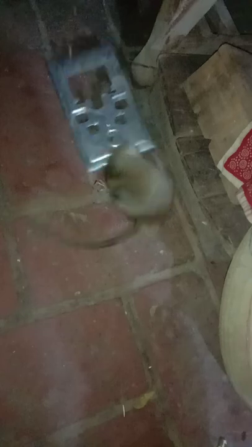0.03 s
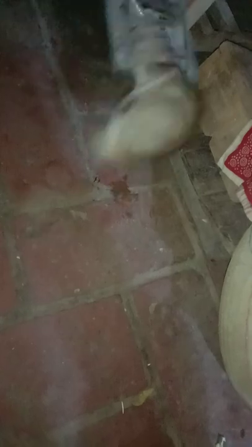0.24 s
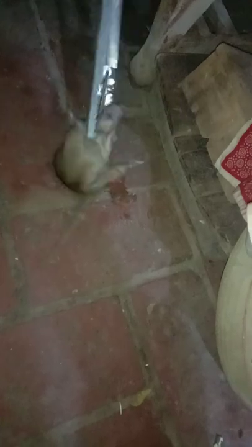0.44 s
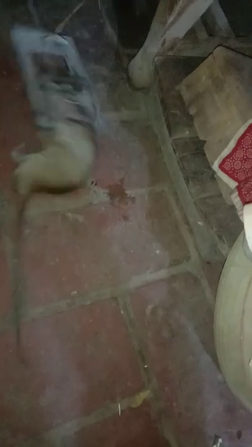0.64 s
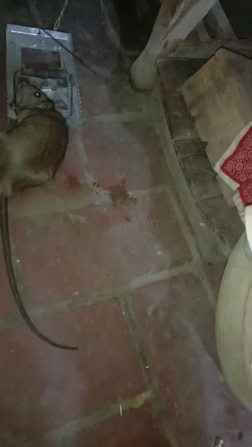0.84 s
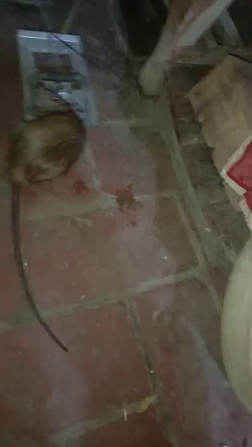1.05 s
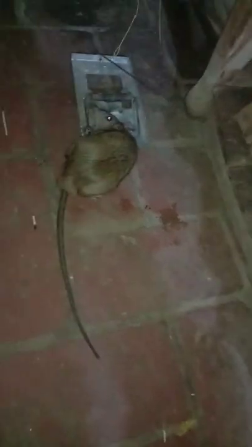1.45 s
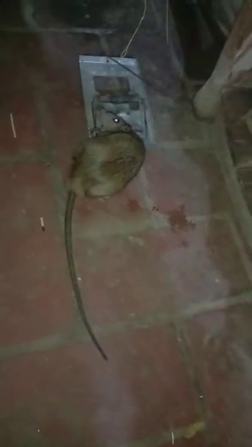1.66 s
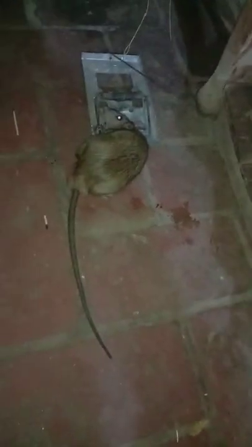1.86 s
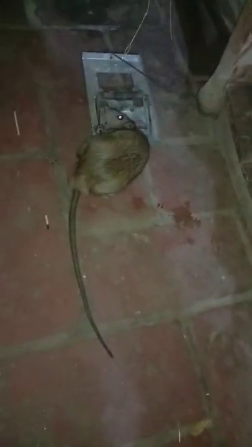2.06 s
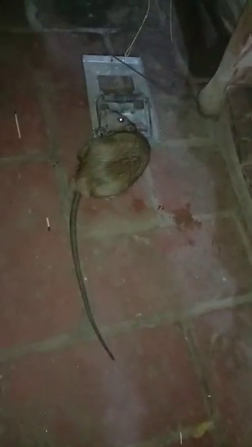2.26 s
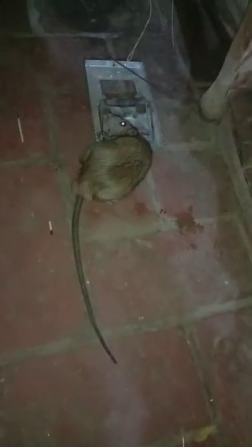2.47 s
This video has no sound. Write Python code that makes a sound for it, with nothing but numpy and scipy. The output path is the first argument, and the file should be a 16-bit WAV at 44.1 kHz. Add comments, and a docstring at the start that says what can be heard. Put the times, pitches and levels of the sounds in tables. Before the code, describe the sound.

Close by in a small room, a steel trap rattles and skids across tiles in dense, bright bursts while a rat's body thumps softly. The clatter ends quickly, and only a few light rustles remain over low room noise.

```python
"""A small room with a tiled floor: a rat in a sheet-steel snap trap thrashes for about a second.
The trap slams down and chatters in runs of tiny bounces, and skids over grit; its plate and
wire bow ring until it lies flat, and the soft body lands in low thumps. A few faint shuffles
follow as the animal lies almost still, over the room's low, uneven rumble and thin hiss."""
import sys
import numpy as np
from scipy import signal
from scipy.fft import rfft, irfft
from scipy.io import wavfile
from scipy.ndimage import uniform_filter1d, minimum_filter1d

SR = 44100
rng = np.random.default_rng(int(sys.argv[2]) if len(sys.argv) > 2 else 0)


def dump_mix(stems):
    """Bounce the given channels to the path in sys.argv[1] as a 16-bit WAV at rate SR."""
    frames = np.atleast_2d(stems).T  # one column per channel
    limited = np.clip(frames, -1, 1)  # hard clip at full scale
    pcm = np.round(limited * 32767).astype(np.int16)
    wavfile.write(sys.argv[1], SR, pcm)


N = 110250
TIME = np.arange(N) / SR


def from_db(db):
    """Decibels to gain."""
    return 10 ** (np.asarray(db) / 20)


def unit(x):
    """Scale to an energy of one."""
    return x / np.sqrt(np.sum(x ** 2) + 1e-20)


def convolve(x, response):
    """Pass a sound through a response."""
    return signal.fftconvolve(x, response)[:N]


def equalise(x, curve, size=8192):
    """Minimum-phase EQ along a curve of (freq_hz, gain_db); white noise keeps its level."""
    hz, db = np.transpose(curve)
    grid_hz = np.maximum(np.linspace(0, SR / 2, size // 2 + 1), 1)
    gain = from_db(np.interp(np.log(grid_hz), np.log(hz), db))
    cepstrum = irfft(np.log(gain))
    cepstrum[1:size // 2] *= 2
    cepstrum[size // 2 + 1:] = 0
    response = irfft(np.exp(rfft(cepstrum)))
    return convolve(x, unit(response))


def decay(t60_s, size):
    """A fall of 60 dB in t60_s seconds."""
    return np.exp(-np.log(1000) * TIME[:size] / t60_s)


def add(track, start_s, sound):
    """Mix a sound in at a given time."""
    i = max(int(start_s * SR), 0)
    track[..., i:i + sound.shape[-1]] += sound[..., :N - i]


# EQ of the room's rumble and of its hiss: freq_hz, gain_db
RUMBLE_EQ = [(30, -35), (60, -26.5), (88, -11.5), (100, 4), (126, -0.5), (140, -10.5), (185, -12.5),
             (235, -17.5), (257, -7.5), (285, -30.5), (500, -54.5)]
HISS_EQ = [(100, -7.5), (400, 5), (1050, -2.5), (1240, 5), (1420, -3), (1700, -4), (2300, -9),
           (3400, -10.5), (5000, -10.5), (6200, -13), (6600, -18.5), (7200, 2), (7750, -2.5), (8400, -21.5),
           (13800, -32), (15300, -16), (16000, -25)]
# Fader ride on the room tone: time_s, gain_db
ROOM_TONE_RIDE = [(.08, -14), (.3, -13), (.8, -2), (1.0, 4.5), (2.5, 3)]
def room_tone(rumble_db=-58.5, hiss_db=-72.5):
    """A narrow, beating rumble under faint hiss, both swelling over the first second."""
    rumble = from_db(rumble_db) * equalise(rng.standard_normal(N), RUMBLE_EQ)
    hiss = from_db(hiss_db) * equalise(rng.standard_normal(N), HISS_EQ)
    ride_db = np.interp(TIME, *np.transpose(ROOM_TONE_RIDE))
    return (rumble + hiss) * from_db(ride_db)


def contacts(envelope, per_s, spread_db=3.5, plate_t60_s=0.027):
    """Tiny random contacts under an envelope, each ringing the plate's crowded, damped modes."""
    size = len(envelope)
    touches = rng.random(size) < per_s / SR
    force = from_db(spread_db * np.minimum(rng.exponential(1, size), 3))
    clicks = touches * force * rng.choice([-1, 1], size)
    clicks[0] = 3  # a firm first contact
    plate = rng.standard_normal(size) * decay(plate_t60_s, size)
    return unit(convolve(clicks * envelope, plate))


def drag(length_s, edge_s=0.0017, sag_db=6.5, size=8192):
    """A stroke over grit at unit level, sagging as it slows."""
    t = TIME[:size]
    gate = np.clip(np.minimum(t, length_s - t) / edge_s, 0, 1)
    stroke = gate * from_db(-sag_db * t / length_s)
    return contacts(stroke, per_s=2500) * np.sqrt(length_s * SR)


# Faint rubs as the animal shifts: start_s, length_s, level_db, centre_hz, width_hz
SHUFFLES = [(0.071, 0.047, -72.5, 654, 304), (1.032, 0.075, -57, 3560, 1040),
            (1.023, 0.11, -53, 6350, 2430), (1.182, 0.025, -66.5, 3630, 904),
            (1.167, 0.078, -79, 8900, 1208), (1.215, 0.021, -72, 3690, 905),
            (1.697, 0.096, -68, 1230, 131.2), (1.712, .06, -71.5, 1674, 200),
            (2.235, 0.017, -63.5, 3400, 598)]
def shuffles():
    """Light strokes that each wake only one resonance."""
    out = np.zeros(N)
    for start_s, length_s, level_db, centre_hz, width_hz in SHUFFLES:
        edges_hz = [centre_hz - width_hz / 2, centre_hz + width_hz / 2]
        band = signal.butter(2, edges_hz, "band", fs=SR, output="sos")
        rub = unit(signal.sosfilt(band, drag(length_s))) * np.sqrt(length_s * SR)
        add(out, start_s, from_db(level_db) * rub)
    return out


def sends(level_db, tile_db, thud_db, sizzle_db):
    """Gains into the steel, tile, thud and sizzle buses; the last three are relative to level_db."""
    return from_db(level_db + np.array([[0], [tile_db], [thud_db], [sizzle_db]]))


# Scrapes of the trap: start_s, length_s, level_db, tile_send_db, thud_send_db, sizzle_send_db
SKIDS = [(0.084, 0.023, -59.5, 9.5, 2, -14), (0.103, 0.032, -50, 6, -10.5, -7),
         (0.15, 0.062, -46, -6, -12.5, -6.5), (0.214, 0.066, -33, -15, -30.5, 0),
         (0.299, 0.021, -34.5, -2.5, -13.5, 0.5), (0.32, 0.073, -27.5, -4.5, -4.5, -3.5),
         (0.405, 0.038, -26, -5, -0.5, 1), (0.467, 0.055, -34, 0.5, -13, 3),
         (0.525, 0.048, -36.5, 1, 2.5, -5), (0.644, 0.1, -31.5, -8, -18, -0.5),
         (0.685, 0.061, -35.5, -5.5, -25, 1.5), (0.769, 0.032, -35.5, -5.5, -28, -1.5),
         (0.804, 0.12, -35.5, -28, -36.5, -4.5), (1.026, .08, -62, 6.5, 8, -9)]
def skids():
    """The plate drags over the tiles, feeding the four buses."""
    buses = np.zeros((4, N))
    for start_s, length_s, level_db, *sends_db in SKIDS:
        add(buses, start_s, sends(level_db, *sends_db) * drag(length_s))
    return buses


# EQ of the bright sheet steel and of its top sizzle: freq_hz, gain_db
STEEL_EQ = [(400, -56.5), (1500, -22.5), (2150, -27.5), (2450, -9.5), (2950, -6.5), (3600, -10), (4700, -6),
            (5500, -1.5), (6500, -2.5), (7300, 2.5), (8100, -9.5), (9000, -11.5), (10800, -14),
            (12000, -19.5), (14000, -21), (16000, -36.5)]
SIZZLE_EQ = [(9000, -30), (13500, -24), (14150, -9), (14600, 0), (15000, -1), (15400, -2), (15600, -26)]
def trap_tone(steel, sizzle, sizzle_db=-6.5):
    """The trap's side of each contact: a metallic crash with a sizzle near 15 kHz."""
    return equalise(steel, STEEL_EQ) + from_db(sizzle_db) * equalise(sizzle, SIZZLE_EQ)


# EQ of the hard tile and of the dull thud under it: freq_hz, gain_db
TILE_EQ = [(100, -56), (300, -29.5), (560, -13), (790, 0), (1000, -2), (1230, 6), (1430, -0.5), (1900, -4),
           (2600, 1), (4000, -6.5), (8000, -11.5)]
THUD_EQ = [(30, -35.5), (70, -15), (170, 7.5), (300, 0.5), (450, -6.5), (700, -0.5), (1300, -29),
           (3000, -55)]
def floor_tone(tile, thud, tile_db=-9.5, thud_db=-17):
    """The floor's side of each contact: a midrange knock or grind over a dull thud."""
    return from_db(tile_db) * equalise(tile, TILE_EQ) + from_db(thud_db) * equalise(thud, THUD_EQ)


def clank(tile, pitch_hz=1280, width_hz=93, gain_db=-24.5, size=4096):
    """Contact with the tile wakes a short, hollow ring of the tile itself."""
    t = TIME[:size]
    mode = np.exp(-np.pi * width_hz * t) * np.sin(2 * np.pi * pitch_hz * t)
    return from_db(gain_db) * convolve(tile, unit(mode))


# Hits of the trap on the floor:
# start_s, level_db, tile_send_db, thud_send_db, sizzle_send_db, ring_send_db, bounce_fade_s
STRIKES = [(0.103, -49, -2.5, 2.5, -1, 3, .005), (0.1279, -35.5, -6.5, -40, 8, -4.5, .003),
           (0.14, -35.5, -27, -29.5, 4.5, -6, .004), (0.186, -45, -14, -26, -0.5, -3.5, .006),
           (0.21, -31.5, -10.5, -26, 2.5, -12, .005), (0.2279, -32, -24, -34.5, 2, 3.5, .007),
           (0.2946, -27.5, -12.5, -12.5, -5.5, -1, .004), (0.3163, -19.5, -11.5, -24.5, -5, -1, 0.0093),
           (0.3237, -32, -9, -6, -6.5, -11, .006), (0.358, -33.5, -10.5, -5.5, -9.5, -3, .006),
           (0.3976, -11, 8.5, -4, -5, -13, .004), (0.432, -37, -4, -12.5, -5, -7.5, .005),
           (0.455, -18.5, -7, -23.5, -1.5, -7, .004), (0.4621, -22.5, -19.5, -22, 2, 5.5, .005),
           (0.49, -31, -8.5, -14.5, 5, -7.5, .004), (0.595, -29, 5.5, 3.5, 0.5, -7.5, .002),
           (0.5976, -20, 3.5, -1.5, 3.5, -9, 0.0082), (0.6254, -30.5, -9, -6.5, 3.5, -6, .003),
           (0.639, -18, -22.5, -16.5, 3.5, -4.5, .002), (0.6806, -13.5, -5, -34, -7, -2.5, .006),
           (0.697, -26, -6.5, -23, -4, -3, .004), (0.724, -30, -3.5, -25.5, 5, -1.5, .004),
           (0.7560, -21.5, -17.5, -33, 1, -2.5, .004), (0.7639, -25.5, -28, -28, -2.5, 7.5, .006),
           (0.802, -23, -23.5, -29, -1, 4.5, .004), (0.815, -28.5, -23, -31.5, 3.5, -1, .004),
           (0.8454, -20.5, -35, -43, -6.5, 2.5, .001), (0.8577, -32.5, -21.5, -39.5, -10, 8, .004),
           (0.8807, -26, -38, -21, -9, 2, .003), (0.895, -35, -20, -29.5, 1, -18, .003),
           (1.0275, -49, -11, -22, -0.5, -17, .004), (1.078, -54.5, 0, -22, -16, 11.5, .004),
           (2.239, -61.5, -4, -20, -8, -8, 0.0058)]
def strikes(size=8192):
    """Each hit is a quick run of dying bounces, feeding the four buses."""
    buses = np.zeros((4, N))
    for start_s, level_db, *sends_db, _, fade_s in STRIKES:
        bounces = np.exp(-TIME[:size] / fade_s)
        crack = contacts(bounces, per_s=2800) * np.sqrt(fade_s * SR)
        add(buses, start_s, sends(level_db, *sends_db) * crack)
    return buses


# Ringing partials of the plate and wire bow: pitch_hz, gain_db, t60_s
STEEL_MODES = [(1620, -22, .16), (2975, -1, .09), (3230, -10, .1), (4517, -6, .11), (5385, -6, .17),
               (5468, -5, .18), (5522, -3, .24), (5627, -3, .27), (6033, -8, .16), (6160, -5, .23),
               (6205, -5, .27), (6570, -6, .17), (6885, -4, .2), (7083, -1, .19), (7250, 2, .23),
               (7567, -2, .16), (8814, -7, .14), (10450, -13, .12), (11750, -20, .26), (13050, -20, .11),
               (14686, -6, .12), (15035, -4, .15)]
def ringing(trim_db=-12, spread_db=2.5, lies_flat_s=0.9, mute_db_per_s=149, size=22050):
    """Each hit rings the long modes, their mix set by the point of contact; lying flat mutes them."""
    out, t = np.zeros(N), TIME[:size]
    partials = np.array([from_db(gain_db) * decay(t60_s, size) * np.exp(2j * np.pi * pitch_hz * t)
                         for pitch_hz, gain_db, t60_s in STEEL_MODES])
    for start_s, level_db, *_, ring_db, _ in STRIKES:
        strengths = from_db(spread_db * rng.standard_normal(len(partials)))
        phases = np.exp(2j * np.pi * rng.random(len(partials)))
        ring = ((strengths * phases) @ partials).imag
        mute_db = mute_db_per_s * np.maximum(start_s + t - max(lies_flat_s, start_s), 0)
        add(out, start_s, from_db(level_db + ring_db + trim_db - mute_db) * ring)
    low_cut = signal.butter(2, 1200, "high", fs=SR, output="sos")
    return signal.sosfilt(low_cut, out + 1e-18)


# Landings of the rat's body: start_s, level_db
BODY_THUMPS = [(0.288, -52), (0.349, -61.5), (0.397, -35.5), (0.53, -43.5), (0.556, -43), (0.60, -52.5),
               (0.639, -54), (0.745, -56), (0.777, -49.5), (0.974, -42), (1.046, -57)]
def body_thumps(centre_hz=118, range_hz=16, swell_s=0.0088, size=8192):
    """The soft body pushes on the floor: a few low cycles that swell and die."""
    out, t = np.zeros(N), TIME[:size]
    push = t / swell_s * np.exp(1 - t / swell_s)
    for start_s, level_db in BODY_THUMPS:
        pitch_hz = centre_hz + range_hz * (rng.random() - .5)
        add(out, start_s, from_db(level_db) * push * np.sin(2 * np.pi * pitch_hz * t))
    return out


def room_reverb(x, t60_s=0.27, wet_db=-11.5, predelay_s=0.0017, size=26000):
    """The direct sound plus diffuse reflections from tiles and walls."""
    onset = np.clip(TIME[:size] / predelay_s - 1, 0, 1)
    tail = rng.standard_normal(size) * decay(t60_s, size) * onset
    return x + from_db(wet_db) * convolve(x, unit(tail))


def scene():
    """Mono mix: trap, floor and shuffles in the reverb; thumps and room tone dry."""
    steel, tile, thud, sizzle = strikes() + skids()
    trap = trap_tone(steel, sizzle) + ringing() + clank(tile)
    floor = floor_tone(tile, thud) + shuffles()
    return (room_reverb(trap + floor) + body_thumps() + room_tone())[None]


def record(dry):
    """A limiter ducks just ahead of the hardest hits; the opening is muted and the top is cut."""
    threshold_db, release_db_per_s, lookahead_s = -18, 252, 0.01
    silent_until_s, high_cut_hz = 0.078, 15600
    power = uniform_filter1d(dry[0] ** 2, 128)
    level_db = 10 * np.log10(np.maximum(power, 1e-12))
    over_db = np.maximum(level_db - threshold_db, 0)
    release_db = release_db_per_s * TIME
    duck_db = np.maximum.accumulate(over_db + release_db) - release_db
    ahead = int(lookahead_s * SR)
    early_gain_db = minimum_filter1d(-duck_db, ahead, origin=-(ahead // 2))
    smooth_gain_db = uniform_filter1d(early_gain_db, ahead // 2)
    limited = dry * from_db(smooth_gain_db) * (TIME > silent_until_s)
    high_cut = signal.ellip(10, .2, 70, high_cut_hz, fs=SR, output="sos")
    return signal.sosfilt(high_cut, limited)


dry = scene()
out = record(dry)
dump_mix(out)
```